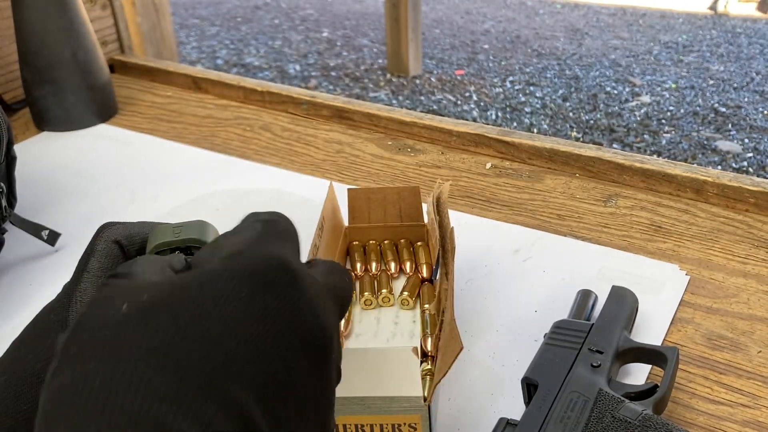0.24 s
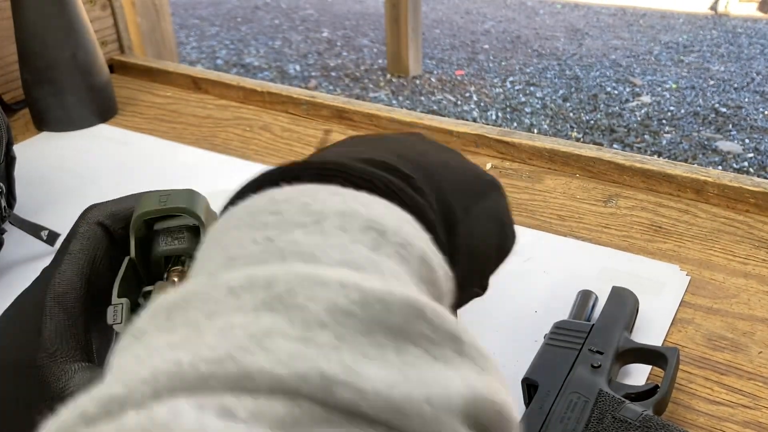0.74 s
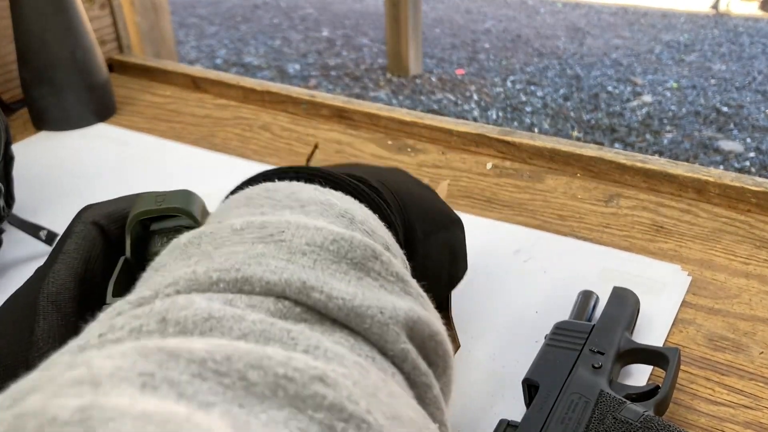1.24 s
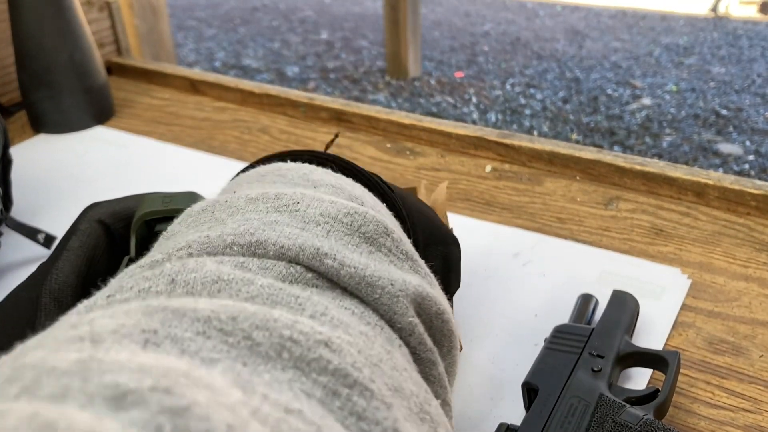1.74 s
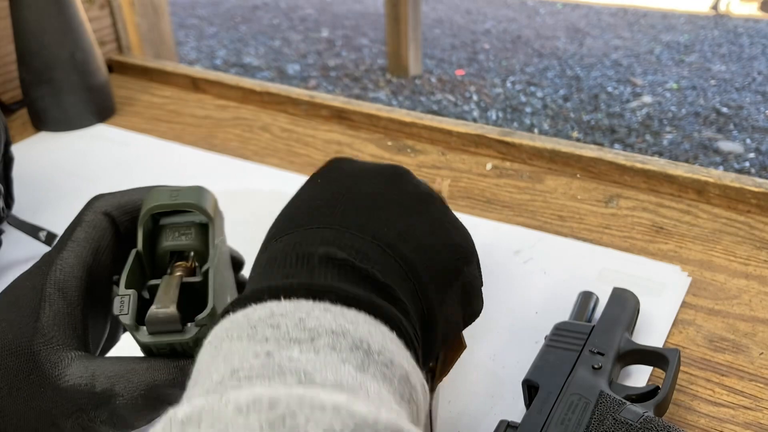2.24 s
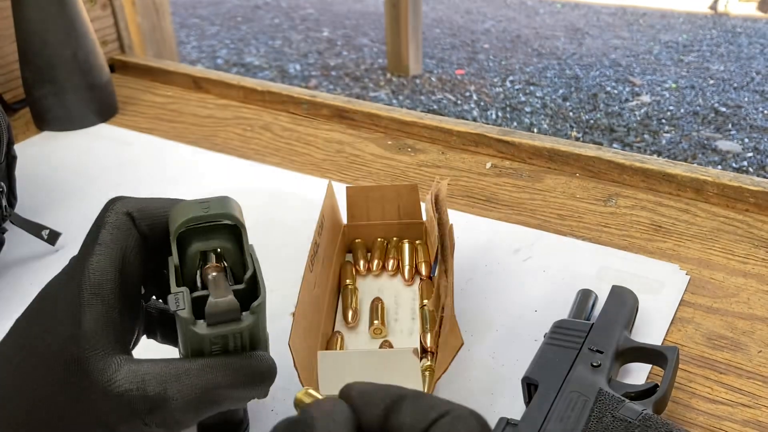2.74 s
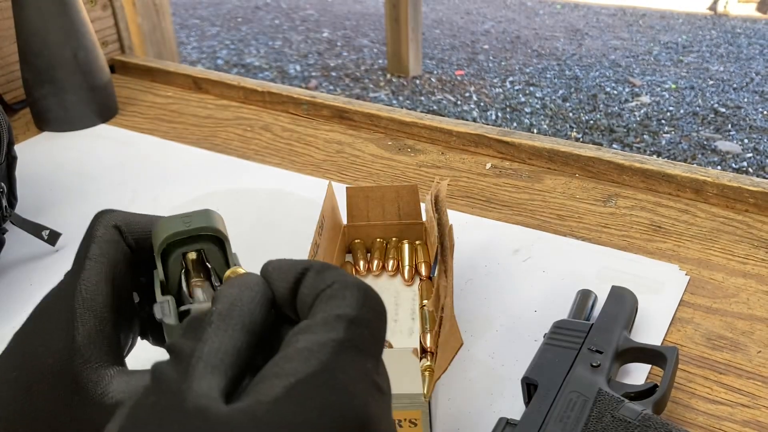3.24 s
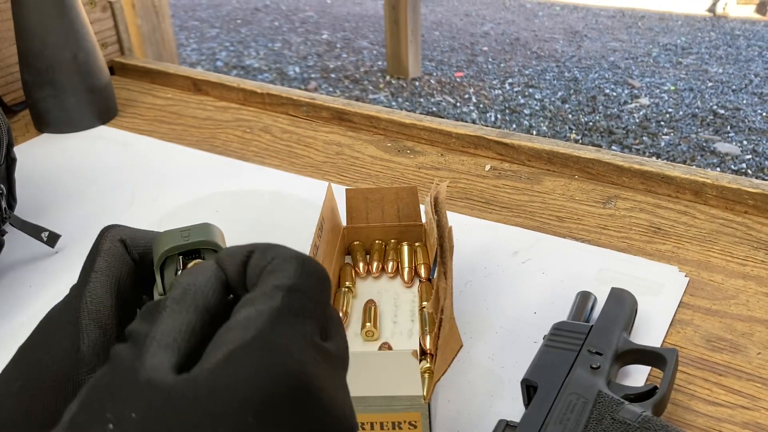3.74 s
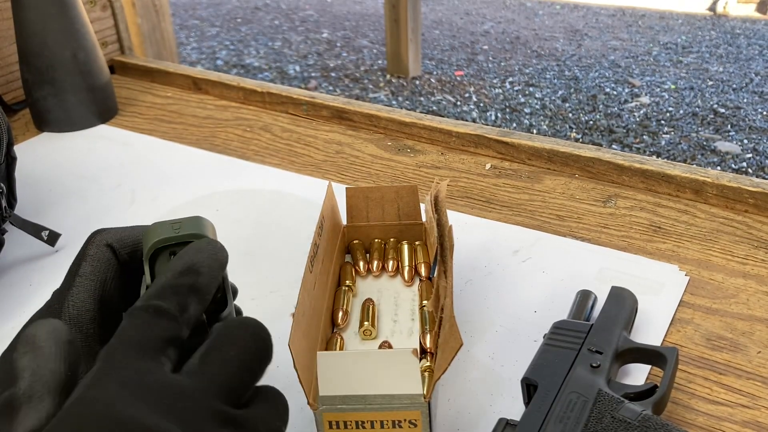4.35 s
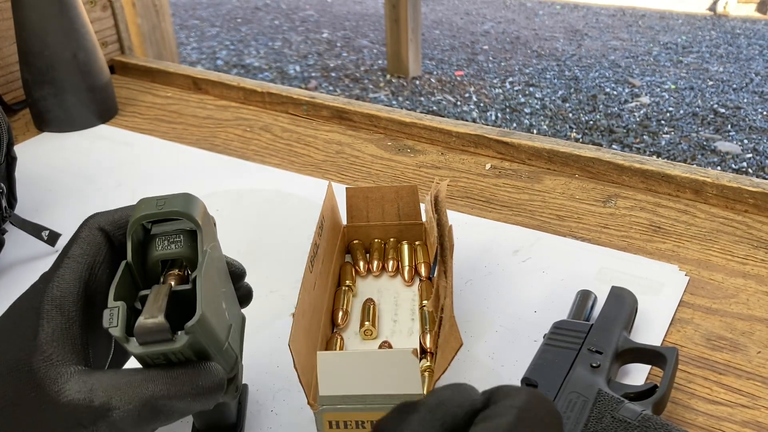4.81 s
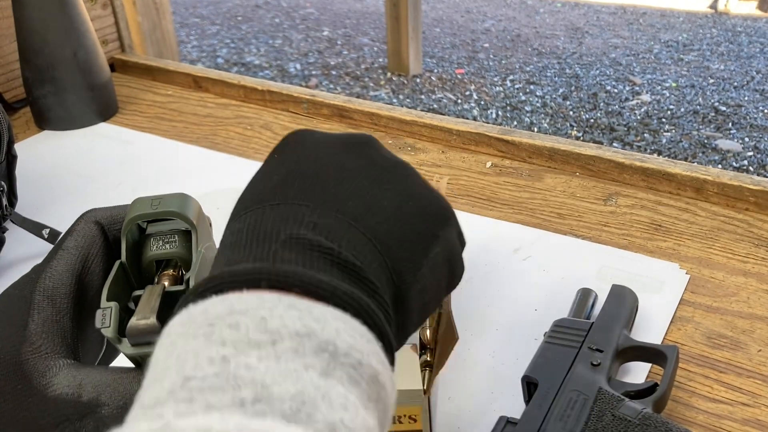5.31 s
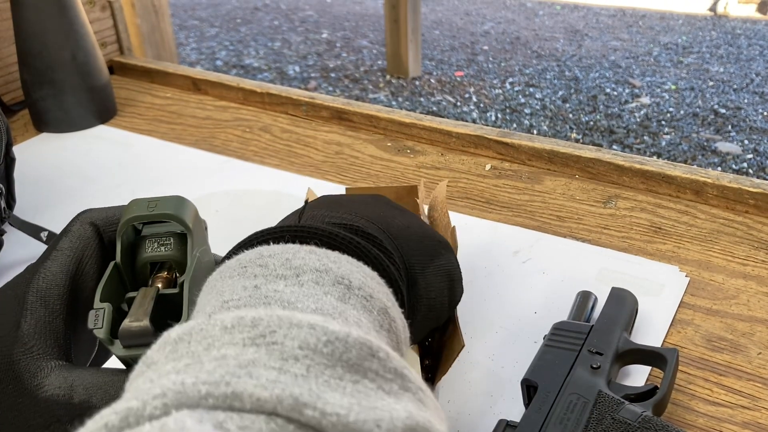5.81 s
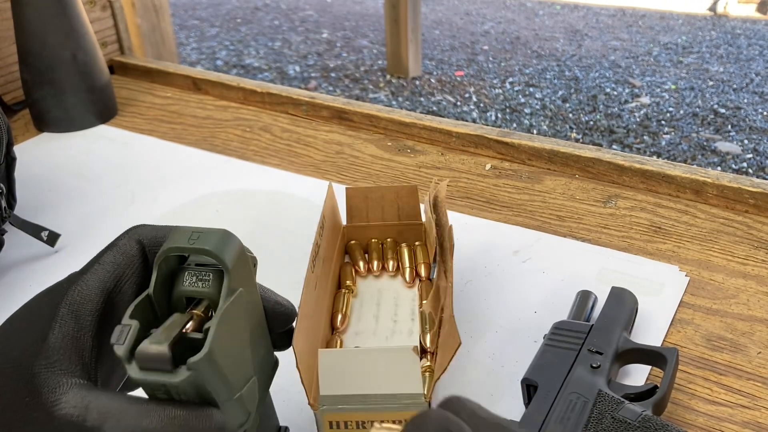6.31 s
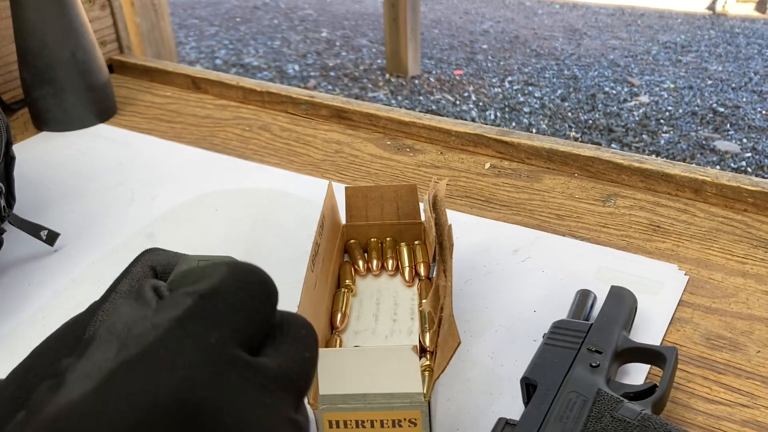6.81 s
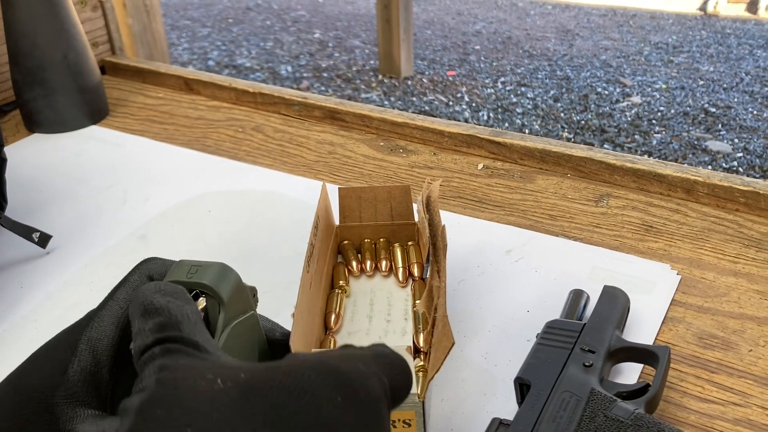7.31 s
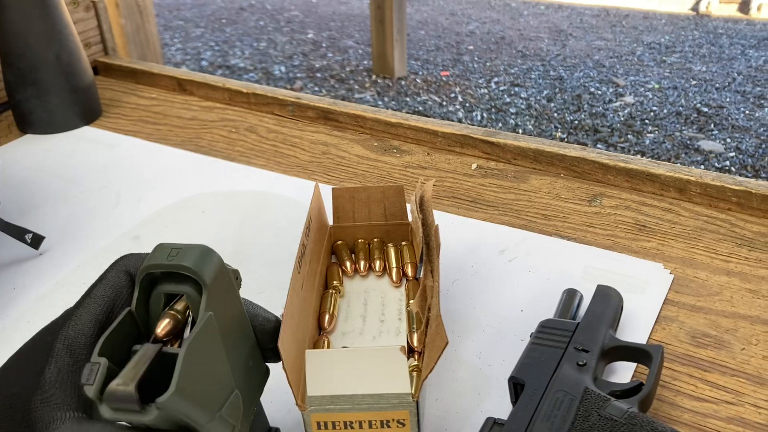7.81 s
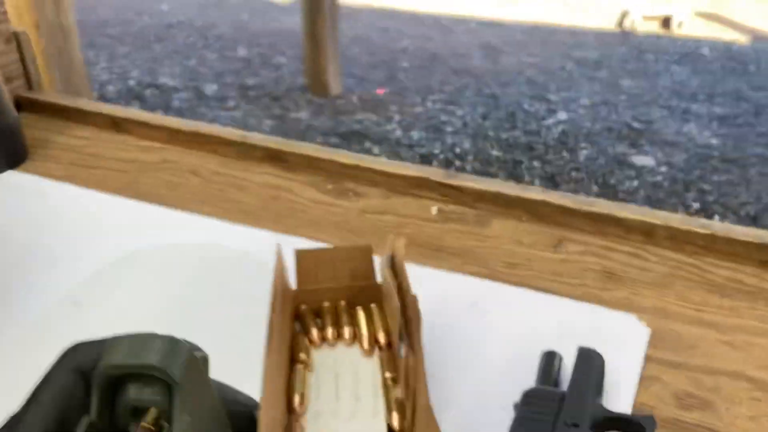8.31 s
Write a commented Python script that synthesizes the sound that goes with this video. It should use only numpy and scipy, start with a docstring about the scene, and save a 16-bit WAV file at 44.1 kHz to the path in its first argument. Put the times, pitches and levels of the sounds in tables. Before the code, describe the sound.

Sharp plastic clicks and small metallic pings as cartridges are pressed into a magazine, with bench thumps, cardboard rustling and glove rubbing.

```python
"""Clicks of a plastic thumb loader lead as gloved hands fill a pistol magazine on a wooden outdoor bench.
Each click is a noisy snap that rings the loader; a sprung plunger and brass cartridges add short falling tones.
The magazine bumps and drags on the bench, and fingers knock and scrape a cardboard cartridge box.
Sleeve and gloves rustle as shaped noise over a low outdoor rumble. A roof adds short echoes to a wide stereo image."""
import sys
import numpy as np
from scipy import signal
from scipy.fft import rfft, irfft
from scipy.io import wavfile

SR = 44100
rng = np.random.default_rng(int(sys.argv[2]) if len(sys.argv) > 2 else 0)


def file_out(sig):
    """Save sig as 16-bit WAV at sys.argv[1]."""
    # one column per channel
    cols = np.atleast_2d(sig).T
    # limit, then scale
    lim = np.clip(cols, -1, 1)
    pcm = np.round(lim * 32767).astype(np.int16)
    wavfile.write(sys.argv[1], SR, pcm)


N = 377496
AGE = np.arange(SR // 4) / SR   # seconds since a contact began
APPROACH_S = .008   # parts scrape for this long before they snap home

# Modes of the loader with its cartridge, before shifts at each contact: pitch_hz, width_hz, level_db
LOADER_MODES = [(1013, 81, 14.5), (1550, 96, 4), (2100, 360, 11.5), (2486, 320, 17), (3490, 200, 18.5),
                (4320, 320, 7.5), (4790, 630, 17.5), (5730, 490, 15.5), (6830, 380, 16), (8500, 1700, 16.5),
                (11550, 1300, -45)]
# Modes of the bench top, before chance level changes: pitch_hz, width_hz, level_db
BENCH_MODES = [(67, 34, 11), (132, 21, 10), (175.4, 5.8, 17.5), (223, 48, 14), (308, 36, 4), (373, 32, 5),
               (424.5, 10, 8.5), (485, 8.8, -19), (627, 19, -5.5), (773, 58, -1.5), (1003, 33, 4)]


def amp(db):
    """Turn decibels into gain."""
    return 10 ** (np.asarray(db) / 20)


def rms_one(x):
    """Scale a sound to an rms of 1."""
    return x / np.sqrt(np.mean(x ** 2) + 1e-20)


def at_hz(points, hz):
    """Read a spectrum between its points on a log-frequency axis."""
    f, value = np.transpose(points)
    return np.interp(np.log(hz + 1), np.log(f), value)


def colour(x, spectrum):
    """Filter a sound with a smooth spectrum."""
    size = x.shape[-1]
    gain = amp(at_hz(spectrum, np.fft.rfftfreq(size, 1 / SR)))
    return irfft(rfft(x) * gain, size)


def drift(rate_hz):
    """Smooth random wandering with a spread of 1: low-passed noise, made at every 40th sample."""
    step = 40
    r = np.exp(-2 * np.pi * rate_hz * step / SR)
    noise = rng.standard_normal(N // step + 2002)
    slow = signal.lfilter([1], [1, -2 * r, r * r], noise)[2000:]   # skip the filter's start
    return np.interp(np.arange(N) / step, np.arange(len(slow)), rms_one(slow))


def fade(t60):
    """Exponential decay that falls 60 dB in t60 seconds."""
    return np.exp(-np.log(1000) * AGE / t60)


def add(track, start_s, sound):
    """Mix a sound into a track from its start time."""
    at = max(round(start_s * SR), 0)
    track[at:at + len(sound)] += sound[:N - at]


def tone(hz, t60, sharp_hz, settle_s):
    """A struck mode starts sharp and sinks to its final pitch as the load settles."""
    pitch = hz + sharp_hz * np.exp(-AGE / settle_s)
    return np.sin(2 * np.pi * np.cumsum(pitch) / SR) * fade(t60)


def detuned(modes, share):
    """Shift each mode by a random share of its pitch for one contact."""
    return [(hz * (1 + share * rng.standard_normal()), width, db) for hz, width, db in modes]


def resonate(force, modes):
    """A body passes the force and rings; each contact point favours other modes."""
    out = force.copy()
    for hz, width, db in modes:
        r = np.exp(-np.pi * width / SR)
        feed = [(1 - r * r) / 2, 0, (r * r - 1) / 2]
        feedback = [1, -2 * r * np.cos(2 * np.pi * hz / SR), r * r]
        out += amp(db + 2 * rng.standard_normal()) * signal.lfilter(feed, feedback, force)
    return out


def registers(edges):
    """Make a steep band-pass for each register from two filters, the second slightly wider."""
    bands = []
    for low, high in zip(edges, edges[1:]):
        limits = ([low, high], [low * .8, min(high * 1.25, .45 * SR)])
        bands.append(np.vstack([signal.butter(2, band, "band", fs=SR, output="sos") for band in limits]))
    return bands


def tilted(db, brightness_db, hump_db):
    """Levels of three registers: a crisper contact puts more sound in the top one."""
    return [db - brightness_db, db + hump_db, db + brightness_db]


def voice_contact(sound, bands, levels_db):
    """Hardness shapes a contact: each register gets the energy of 10 ms at its given rms level."""
    out = 0
    for band, db in zip(bands, levels_db):
        part = signal.sosfilt(band, sound)
        out = out + amp(db) * part / np.sqrt(np.sum(part ** 2) / (SR / 100) + 1e-20)
    return out


def grains(size, grit_db):
    """Friction is a dense train of tiny slips of uneven size."""
    unevenness = np.minimum(rng.exponential(1, size), 5)
    return rms_one(rng.standard_normal(size) * amp(grit_db * unevenness))


def impact(crack_t60, rattle_db, rattle_t60, grit_db, approach_db):
    """Parts scrape together, crack home and then chatter against each other."""
    crack = grains(len(AGE), 0) * fade(crack_t60)
    rattle = amp(rattle_db) * grains(len(AGE), grit_db) * fade(rattle_t60)
    size = round(APPROACH_S * SR)
    approach = amp(approach_db) * grains(size, grit_db) * np.linspace(0, 1, size) ** 2
    return np.concatenate([approach, crack + rattle])


def friction(spectrum, grit_db, catch_db, catch_hz):
    """Fibres slip in clumps as the cloth catches and lets go."""
    slips = grains(N, grit_db) * amp(catch_db * drift(catch_hz))
    return rms_one(colour(slips, spectrum))


def stroke(start_s, length_s, db, swell_db):
    """Gain of one stroke: it sets in, gains or loses pressure evenly, and lets go."""
    attack_s, release_s = 0.033, 0.019   # time constants of the rise and fall outside the stroke
    gain, lead = np.zeros(N), 10 * attack_s
    t = np.arange(-lead, length_s + 10 * release_s, 1 / SR)
    outside = np.maximum(-t, 0) / attack_s + np.maximum(t - length_s, 0) / release_s
    pressure_db = db + swell_db * (np.clip(t / length_s, 0, 1) - .5)
    shape = amp(pressure_db) * np.exp(-outside)
    add(gain, start_s - lead, shape[t >= -start_s])   # leave out what lies before time zero
    return gain


def outdoor_air():
    """Low outdoor rumble: coloured noise, partly shared by both channels."""
    # Spectrum before the overall level is set: pitch_hz, level_db per Hz
    air_spectrum = [(15, -46), (25, -4.5), (70, 3), (153, 6), (384, -12), (7510, -35), (8360, -55),
                    (9070, -56), (10400, -35), (12500, -64.5), (13600, -52), (16000, -49)]
    noise = rng.standard_normal(N) + 0.35 * rng.standard_normal((2, N))
    return amp(-52.0) * rms_one(colour(noise, air_spectrum))


def grip_rumble():
    """Hands shift their grip on the magazine and make a low handling rumble."""
    # Firmness of the grip, before the rumble's 2 dB gain: time_s, level_db
    grip_level = [(0.0, -49), (0.08, -51.5), (0.26, -44.5), (3.33, -44.5), (3.5, -40), (3.77, -46.5),
                  (4.17, -43.5), (4.93, -50.5), (5.34, -44.5), (6.2, -47), (6.98, -44), (7.33, -42),
                  (7.55, -45.5), (8.3, -45.5), (8.56, -55.5)]
    # Spectrum before the level is set: pitch_hz, level_db per Hz
    grip_spectrum = [(25, -20), (45, -11), (62, 6), (100, 1.5), (127, 4), (160, -0.5), (240, -6),
                     (320, -16), (480, -23), (900, -46.5)]
    grip_db = np.interp(np.arange(N) / SR, *np.transpose(grip_level))
    return amp(grip_db + 2) * friction(grip_spectrum, grit_db=1.5, catch_db=2.0, catch_hz=10.0)


def rub_gains():
    """Strokes of glove and sleeve give the gains of rubbing on plastic, on card and of fibre hiss."""
    # A glove brushes the loader; levels are mid-stroke, before each rubbing layer's own gain:
    # start_s, length_s, level_db, swell_db over the stroke, dull body_db relative to the hiss
    glove_strokes = [(0.192, 0.023, -54.5, -15, 1), (0.333, 0.049, -49.5, 8.5, 7.5),
                     (2.531, 0.21, -60.5, 11, -8), (3.292, 0.087, -54.5, -3, -1), (3.582, 0.032, -51, 6, 3),
                     (3.986, 0.071, -53, 13, 2.5), (4.184, 0.11, -54, -1, -45),
                     (4.284, 0.13, -58, 28.5, -29), (4.462, 0.44, -76.5, -32, -8),
                     (4.962, 0.3, -61, -6, 1.5), (5.379, 0.029, -53, 25.5, -6), (6.17, 0.15, -55.5, 4, -39),
                     (6.327, 0.079, -52.5, 6, -31), (6.49, 0.26, -63, 12, -4), (7.092, 0.17, -57, 18, -8),
                     (7.486, 0.37, -59, -16, -1), (7.852, 0.17, -62, 16, -14)]
    # The sleeve drags over the box; levels as above:
    # start_s, length_s, level_db, swell_db over the stroke, fibre hiss_db relative to the card
    sleeve_strokes = [(0.29, 0.25, -52, 1, 1), (0.591, 0.031, -38, -5, -12), (0.702, 0.2, -51.5, -14.5, -2),
                      (0.866, 0.27, -39, -4, -9.5), (1.216, 0.37, -44.5, 2, -8.5),
                      (1.438, 0.12, -42, -1, -4.5), (1.677, 0.099, -41.5, -0.5, -9),
                      (1.792, 0.19, -48.5, -1, -6), (2.044, 0.12, -54, 7, -13),
                      (2.173, 0.12, -44.5, 6, -6.5), (5.474, 0.13, -52, 2, -3.5),
                      (5.863, 0.17, -48, -8.5, -4), (7.765, 0.28, -57.5, -18, -23),
                      (7.986, 0.089, -39, 20.5, -22), (8.113, 0.11, -39.5, -1.5, -14),
                      (8.247, 0.41, -53.5, -23.5, -50)]
    on_plastic, on_card = np.zeros(N), np.zeros(N)
    hiss = np.full(N, amp(-69.5))   # faint glove hiss between strokes
    for *row, body_db in glove_strokes:
        brush = stroke(*row)
        on_plastic += brush
        on_card += amp(body_db) * brush
        hiss += brush
    for *row, hiss_db in sleeve_strokes:
        pull = stroke(*row)
        on_card = np.hypot(on_card, pull)
        hiss = np.hypot(hiss, amp(hiss_db) * pull)
    return on_plastic, on_card, hiss


def cloth_hiss(hiss):
    """Fine fibres slip unevenly and make a bright hiss."""
    # Spectrum before the level is set: pitch_hz, level_db per Hz
    cloth_spectrum = [(3500, 7.5), (6000, 9), (7500, 10.5), (10000, 14.5), (12000, 1.5), (14000, 0.5),
                      (16000, 5), (18000, -2)]
    return amp(2.0) * hiss * friction(cloth_spectrum, grit_db=4.5, catch_db=3.5, catch_hz=28)


def glove_rub(hiss):
    """Glove fibres catch and slip more slowly, with a duller spectrum."""
    # Spectrum before the level is set: pitch_hz, level_db per Hz
    glove_spectrum = [(1300, -8.5), (2300, 7.5), (3100, 1), (4000, -0.5), (5500, -4), (8000, -15)]
    return amp(1.0) * hiss * friction(glove_spectrum, grit_db=3.5, catch_db=3.0, catch_hz=3.5)


def fidgets():
    """Loose parts shift in the loader's shell and tick, about 12 times a second."""
    shifts = (rng.random(N) < 12 / SR) * amp(4 * rng.standard_normal(N))
    bursts = signal.fftconvolve(shifts, fade(0.0074))[:N] * rng.standard_normal(N)
    return rms_one(resonate(bursts, LOADER_MODES))


def shell_rub(on_plastic):
    """A rub wakes mostly the shell's middle modes, about 2 to 4 kHz, while loose parts tick."""
    # Spectrum of the rub before the level is set: pitch_hz, level_db
    shell_spectrum = [(700, -24), (1900, -4), (2900, -11), (3700, 1), (5000, -7.5), (9000, -6)]
    rub = rms_one(colour(resonate(grains(N, grit_db=6.0), LOADER_MODES), shell_spectrum))
    return on_plastic * (amp(-1.0) * rub + amp(-9) * fidgets())


def sleeve_rub(on_card):
    """The sleeve rubs smoothly over the card as its fibres catch and slip."""
    # Spectrum before the level is set: pitch_hz, level_db per Hz
    sleeve_spectrum = [(250, -50.5), (450, 0), (700, 10), (1020, 8.5), (1400, 7.5), (2000, 2.5),
                       (2800, -36), (5000, -69)]
    return amp(-3) * on_card * friction(sleeve_spectrum, grit_db=5.5, catch_db=3.5, catch_hz=44)


def card_ticks(on_card, hiss):
    """Seams and fingertips catch edges of the card; each edge ticks at its own pitch."""
    # Spectrum of the ticks before the level is set: pitch_hz, level_db per Hz
    tick_spectrum = [(300, -6), (950, 14), (1900, 5.5), (4000, 6), (7000, -28), (14000, -70)]
    edge_count, catches_per_s, burst_t60_s = 10, 260, 0.0078   # the rate is shared by all edges
    ticks = 0
    for hz in np.geomspace(650, 3800, edge_count):
        sizes = amp(3 * np.clip(rng.standard_normal(N), -2, 1))
        catches = (rng.random(N) < catches_per_s / edge_count / SR) * sizes
        decay = amp(-60 / (burst_t60_s * SR))
        bursts = signal.lfilter([1], [1, -decay], catches + 1e-18) * rng.standard_normal(N)
        ticks = ticks + resonate(bursts, [(hz, 130, 22.5)])
    return amp(-3.5) * np.sqrt(on_card * hiss) * rms_one(colour(ticks, tick_spectrum))


def loader():
    """Plunger, feed lips and cartridge snap against each other and ring the loader."""
    # Clicks: time_s, level_db, brightness_db per register, magazine thud_db
    clicks = [(0.086, -49.5, -14, -37), (0.1, -32, 0.5, -31), (0.104, -48, 11, -47),
              (0.203, -41, -6.5, -43.5), (0.231, -42.5, -6, -35), (0.404, -42, -3, -49),
              (0.42, -29.5, -2.5, -33), (0.429, -27.5, 3.5, -28.5), (0.5, -36, -8.5, -48),
              (0.501, -42.5, -14, -42), (2.7248, -40, 13.5, -53), (2.989, -44, 0, -60),
              (3.29, -31.5, -0.5, -50), (3.301, -26.5, 3.5, -37), (3.3087, -38, 10, -43),
              (3.378, -35, -8, -52), (3.399, -43.5, 7, -53), (3.551, -55.5, -6.5, -50),
              (3.6328, -35, -1, -25), (3.91, -37.5, 1, -41), (3.922, -35.5, -0.5, -49),
              (4.044, -46.5, -8, -43), (4.263, -32, 5, -40), (4.309, -43, 2, -40), (4.327, -40, 2, -53),
              (4.525, -48.5, -5.5, -49), (5.075, -43.5, -9, -36.5), (5.505, -51.5, -9, -40.5),
              (5.614, -51, -5, -54), (6.288, -50, 6.5, -65), (6.418, -36, 4.5, -50),
              (6.432, -42.5, 12.5, -68), (6.562, -54, 1, -56), (6.73, -47, -4, -66),
              (6.775, -44.5, -2, -56), (7.113, -60, -9, -45), (7.0204, -27, 2.5, -32.5),
              (7.03, -37, 6, -30.5), (7.043, -38, 1, -40), (7.164, -39, 6, -44), (7.192, -40, 1.5, -42),
              (7.217, -43, -10.5, -38), (7.364, -51, 0, -49), (7.405, -43, -1.5, -48.5),
              (7.476, -50, -5, -50), (7.489, -36, 0.5, -53), (7.546, -43.5, 2, -64),
              (7.712, -26.5, -0.5, -60), (7.716, -36.5, -8.5, -62), (7.747, -45, -4, -57)]
    # Limits of the thud register and the three above it: edge_hz
    click_edges = [400, 1500, 3500, 8500, 16500]
    out, bands = np.zeros(N), registers(click_edges)
    for s, db, brightness_db, thud_db in clicks:
        force = impact(crack_t60=0.0066, rattle_db=-17.0, rattle_t60=0.062, grit_db=4.0, approach_db=-17.5)
        levels_db = [thud_db, *tilted(db, brightness_db, hump_db=5.0)]
        modes = detuned(LOADER_MODES, 0.039)   # the hand and spring load shift the pitches
        add(out, s - APPROACH_S, voice_contact(resonate(force, modes), bands, levels_db))
    return out


def plunger():
    """The steel plunger snaps back and rings; the brass cartridge pings against the feed lips."""
    # Plunger snaps: time_s, level_db, tuning as a share of pitch,
    # brightness_db per octave, ring length as a share
    snaps = [(0.1, -20, 1.0, 0, .6), (3.2902, -15, 1.05, -2, .7), (3.3782, -19.5, 1.0, -2, 1.2),
             (6.4208, -11.5, 1.0, -1.5, .62), (7.1635, -25, 1.03, -3, .4)]
    # Plunger modes before each snap's level, tuning and length: pitch_hz, level_db, t60_s
    plunger_modes = [(1965, -13, .11), (2110, -4, .034), (2440, -1, .026), (4080, -8, .028),
                     (4520, -4, .022), (5150, -6, .018), (7200, -3, .012)]
    # Cartridge pings: time_s, level_db, final pitch_hz, t60_s
    pings = [(0.429, -16, 7700, 0.051), (2.7248, -35, 1740, 0.034), (2.724, -17, 15000, 0.02),
             (3.3015, -18, 3200, 0.027), (3.303, -23, 5150, .025), (3.303, -22, 2400, 0.038),
             (3.91, -12, 6800, 0.013), (7.022, -16, 4550, 0.024), (7.0197, -21, 3160, 0.082),
             (7.715, -15.5, 2440, 0.023)]
    sharp_hz, settle_s = 195, 0.011   # each tone starts this sharp and settles
    out = np.zeros(N)
    for s, db, tuning, brightness_db, length in snaps:
        for hz, mode_db, t60 in plunger_modes:
            octaves = np.log2(hz / plunger_modes[0][0])
            gain = amp(db + mode_db + brightness_db * octaves)
            start_s = s + rng.uniform(0, 0.00078)
            add(out, start_s, gain * tone(hz * tuning, t60 * length, sharp_hz, settle_s))
    for s, db, hz, t60 in pings:
        add(out, s, amp(db) * tone(hz, t60, sharp_hz, settle_s))
    return out


def bench():
    """The magazine's base pushes on the boards and settles."""
    # Bumps, from a booming padded hand to the knocking bare base plate:
    # time_s, level_db before the hardness loss, hardness from 0 to 1
    bumps = [(0.104, -21, 0.19), (0.343, -24.5, 0.027), (0.435, -22.5, 0.31), (0.514, -22, 0.045),
             (0.679, -31.5, 0.018), (1.28, -18.5, 0.2), (1.388, -19, 0.18), (1.937, -24.5, 0.11),
             (2.73, -22.5, 0.083), (3.001, -23, 0.34), (3.008, -11.5, 0.29), (3.296, -24, 0.51),
             (3.407, -29.5, 0.016), (3.597, -19.5, 0.31), (3.6364, -8, 0.74), (3.655, -24, 0.045),
             (3.912, -21.5, 0.74), (4.521, -22.5, 0.14), (5.079, -25, 0.75), (5.139, -26.5, 0.017),
             (5.239, -25.5, 0.031), (5.437, -21.5, 0.1), (5.7, -34, .05), (6.436, -20, 0.094),
             (6.719, -24.5, 0.042), (6.772, -18, 0.2), (6.794, -25.5, 0.092), (6.904, -25, 0.072),
             (7.024, -17, 0.37), (7.453, -23.5, .02), (7.49, -25, 0.57), (7.722, -22, 0.017),
             (8.126, -19.5, 0.11), (8.215, -22, 0.2)]
    # Limits of the three registers: edge_hz
    bump_edges = [50, 150, 400, 1400]
    out, bands = np.zeros(N), registers(bump_edges)
    for s, db, hardness in bumps:
        force = amp(-24.5) * grains(len(AGE), 0) * fade(0.092)
        force[0] += 1
        # registers lose level as their hardness differs from the bump's
        levels_db = db - 36.5 * np.abs(np.array([0, .5, 1]) - hardness)
        add(out, s - .003, voice_contact(resonate(force, BENCH_MODES), bands, levels_db))
    return out


def drags():
    """The base plate judders over the boards in tiny slips."""
    # Shoves over the bench: middle_s, level_db, brightness_db per register,
    # spread_s of the bell-shaped push (at least 5 ms is used)
    drag_events = [(0.196, -41, -1, 0.02), (0.368, -39.5, -9, 0.066), (2.986, -38, -7, 0.018),
                   (3.572, -36.5, -3.5, 0.014), (3.601, -32.5, 2, 0.0098), (3.62, -37, 4, 0.016),
                   (4.058, -42.5, -8, 0.043), (4.316, -38, -9, 0.025), (6.68, -40.5, -6.5, 0.14),
                   (6.726, -37.5, 0.5, 0.018), (6.78, -42.5, 13.5, 0.0043), (6.907, -39, -2, 0.019),
                   (7.503, -40, -4, 0.028), (7.552, -42, -7.5, 0.0074), (8.238, -45.5, 6, 0.059)]
    # Limits of the three registers: edge_hz
    drag_edges = [120, 280, 550, 1200]
    out, middle, bands = np.zeros(N), AGE[-1] / 2, registers(drag_edges)
    for s, db, brightness_db, spread in drag_events:
        push = np.exp(-((AGE - middle) / max(spread, .005)) ** 2 / 2)
        judder = resonate(push * grains(len(AGE), grit_db=6.5), BENCH_MODES)
        levels_db = tilted(db, brightness_db, hump_db=4.0)
        add(out, s - middle, voice_contact(judder, bands, levels_db))
    return out


def box():
    """Fingers and cartridges knock the card: the struck wall rings over the hollow of the box."""
    # Knocks: time_s, level_db, brightness_db per register, wall pitch_hz, contact t60_s
    knocks = [(0.279, -48.5, -6, 1420, 0.022), (0.888, -47.5, 14, 1020, 0.018),
              (0.932, -52.5, 15, 950, 0.0091), (0.948, -50, -17, 1160, 0.023),
              (1.077, -45, -1, 1130, 0.035), (1.103, -47, 5, 940, 0.028), (1.292, -38.5, -10, 1470, 0.04),
              (1.3718, -34, -13, 1160, 0.016), (1.382, -37.5, 4, 1390, 0.033),
              (1.397, -37.5, -1, 930, 0.036), (1.49, -45, -8.5, 2260, 0.026),
              (1.528, -45.5, -4, 1040, 0.017), (1.555, -47, 2, 2200, .025),
              (1.605, -41.5, -8.5, 1540, 0.057), (1.697, -43.5, -6, 1230, 0.044),
              (1.719, -49, -13, 1130, 0.013), (1.822, -40.5, -6, 1600, 0.034),
              (1.863, -37, -8, 1550, 0.013), (1.932, -31, -5, 1770, 0.032), (1.978, -39.5, -7, 1870, 0.023),
              (2.044, -51, -9, 1520, 0.037), (2.158, -47.5, -4.5, 1750, 0.049),
              (5.2107, -29, -7.5, 1760, 0.007), (5.2133, -34, -8.5, 1120, .014),
              (5.222, -43, 1, 1120, 0.015), (5.236, -42, -1, 1545, 0.025), (5.379, -47, -7, 1600, 0.069),
              (5.424, -45.5, -13.5, 1090, 0.04), (5.676, -53.5, -1, 2560, 0.032),
              (5.777, -47.5, -9, 1770, .035), (5.799, -50, -11.5, 1670, 0.018),
              (5.813, -53, 5, 1640, 0.025), (5.89, -47.5, -10, 1050, 0.033), (7.988, -62.5, 17, 990, 0.017),
              (8.13, -57, -13, 880, 0.018), (8.216, -59, 0, 1140, .015)]
    # Limits of the hollow's register and the three above it: edge_hz
    knock_edges = [150, 400, 1400, 3500, 16000]
    # Box modes before shifts at each knock: pitch_hz, width_hz, level_db
    box_modes = [(617, 17, 24), (1110, 280, 22), (1250, 40, -8), (1700, 54, 34), (1930, 210, 25),
                 (2170, 380, 32), (4440, 4700, 10)]
    out, bands = np.zeros(N), registers(knock_edges)
    for s, db, brightness_db, wall_hz, crack_t60 in knocks:
        force = impact(crack_t60, rattle_db=-19, rattle_t60=0.11, grit_db=-0.5, approach_db=-12)
        modes = [(wall_hz, 110, 32), *detuned(box_modes, 0.042)]
        levels_db = tilted(db, brightness_db, hump_db=4.5)
        hollow_db = levels_db[0] - 22
        add(out, s - APPROACH_S, voice_contact(resonate(force, modes), bands, [hollow_db, *levels_db]))
    return out


def seating():
    """The magazine bottoms out: the bench gives a dull, sinking thump and the magazine's body rings."""
    # Bench thumps: time_s, level_db, final pitch_hz, t60_s
    thumps = [(0.432, -12, 175, .035), (1.282, -18, 121, 0.039), (2.731, -15, 117, 0.044),
              (3.0063, -4.5, 189, 0.049), (3.635, -5, 223, 0.024), (5.436, -15.5, 115, 0.032),
              (7.023, -22, 178, .05)]
    # Body rings: time_s, level_db
    body_rings = [(3.003, -31), (3.6335, -11), (6.776, -30.5), (7.021, -29)]
    # Magazine modes before each ring's level: pitch_hz, level_db, t60_s
    magazine_modes = [(396, -3.5, 0.055), (653, -11, 0.051), (1015, -4.5, 0.032), (1320, -15.5, 0.029),
                      (1520, -5.5, 0.021), (2420, -9, 0.026)]
    sharp_share, settle_s, rise_s = 0.94, 0.0043, 0.0027   # extra starting pitch; time constants
    out = np.zeros(N)
    for s, db, hz, t60 in thumps:
        load = 1 - np.exp(-AGE / rise_s)
        add(out, s, amp(db) * load * tone(hz, t60, sharp_share * hz, settle_s))
    for s, db in body_rings:
        for k, (hz, mode_db, t60) in enumerate(magazine_modes):
            ring = np.sin(2 * np.pi * hz * AGE) * fade(t60)
            add(out, s, (-1) ** k * amp(db + mode_db) * ring)   # neighbouring modes start in opposite directions
    return out


def board():
    """A firm push near its middle leaves a board of the bench humming."""
    # Pushes: time_s, level_db
    board_pushes = [(0.433, -19), (3.009, -27), (7.025, -27), (7.721, -31)]
    out = np.zeros(N)
    for s, db in board_pushes:
        add(out, s, amp(db) * np.sin(2 * np.pi * 178.9 * AGE) * fade(0.26))
    return out


def slides():
    """A part of plastic, brass or card gathers speed, scraping, and stops."""
    # Short slides: peak_s, level_db, brightness_db per register, swell_s time constant (at least 2 ms is used)
    slide_events = [(0.497, -34.5, 3, 0.0085), (0.699, -48, 14, 0.011), (1.279, -32.5, -1, 0.012),
                    (3.312, -38.5, 7, 0.014), (4.252, -50.5, -11, 0.0028), (4.413, -41, 4.5, 0.016),
                    (5.407, -52.5, -14, 0.034), (5.431, -43.5, -8, 0.014), (5.702, -47, -9, 0.025),
                    (6.408, -52.5, 15, 0.07), (7.638, -40, -1, 0.016), (7.696, -43.5, -9, 0.017),
                    (7.713, -33, 6.5, 0.0077), (7.724, -49, -8, 0.007)]
    # Limits of the three registers: edge_hz
    slide_edges = [600, 2000, 7000, 16000]
    out, lead, bands = np.zeros(N), AGE[-1] / 2, registers(slide_edges)
    for s, db, brightness_db, swell in slide_events:
        speed = np.exp(np.minimum((AGE - lead) / max(swell, .002), (lead - AGE) / 0.0087))
        scraping = speed * grains(len(AGE), grit_db=5.5)
        levels_db = tilted(db, brightness_db, hump_db=1.3)
        add(out, s - lead, voice_contact(scraping, bands, levels_db))
    return out


def scrapes():
    """A cartridge or knuckle scrapes the card: uneven slips ring one wall of the box."""
    # Scrapes: middle_s, level_db, spread_s of the bell-shaped swell (at least 3 ms is used), wall pitch_hz
    scrape_events = [(0.901, -36, 0.012, 1070), (0.975, -46, .03, 1060), (1.049, -37.5, .022, 940),
                     (1.08, -38, 0.0053, 3500), (1.106, -35.5, .011, 910), (1.205, -43, 0.039, 970),
                     (1.616, -42.5, 0.0094, 710), (1.712, -43.5, 0.015, 3350), (1.827, -32.5, .008, 1940),
                     (1.944, -38, 0.0069, 1340), (5.226, -36, 0.017, 960), (5.394, -40.5, .012, 1390),
                     (5.509, -34, 0.0036, 1010), (5.549, -44, .014, 1010), (5.761, -53, 0.031, 1100),
                     (5.803, -40, 0.011, 1650), (5.875, -46.5, 0.022, 1030)]
    slips_per_s, sharpness, ring_db = 700, 4.8, 40.5   # sharpness is wall pitch over width
    out, middle = np.zeros(N), AGE[-1] / 2
    for s, db, spread, wall_hz in scrape_events:
        slips = (rng.random(len(AGE)) < slips_per_s / SR) * rng.standard_normal(len(AGE))
        wall_modes = [(wall_hz, wall_hz / sharpness, ring_db), (2 * wall_hz, wall_hz, 6)]
        wall = rms_one(resonate(slips, wall_modes))
        swell = np.exp(-((AGE - middle) / max(spread, .003)) ** 2 / 2)
        add(out, s - middle, amp(db) * wall * swell)
    return out


def squeak():
    """Stick and slip drives a thin, broken tone that sinks as the brass slides on."""
    # Squeaks, before pitch waver and level flutter: start_s, length_s, start_hz, end_hz, level_db
    squeak_events = [(3.799, 0.11, 8650, 6900, -56), (6.1, 0.093, 7800, 7300, -63)]
    out = np.zeros(N)
    waver = 1 + .011 * drift(400)
    flutter = amp(4.3 * np.minimum(drift(106), 1))
    for s, length, start_hz, end_hz, db in squeak_events:
        span = slice(round(s * SR), round((s + length) * SR))
        pitch = np.linspace(start_hz, end_hz, span.stop - span.start) * waver[span]
        thin_tone = np.sin(2 * np.pi * np.cumsum(pitch) / SR)
        add(out, s, amp(db) * flutter[span] * signal.windows.tukey(len(pitch)) * thin_tone)
    return out


def edge_rubs():
    """Glove fibres slip over one edge of the loader and keep a narrow band ringing."""
    # Rubs: start_s, length_s, mid-stroke level_db, swell_db over the stroke, pitch_hz, width_hz
    edge_events = [(4.622, 0.39, -66, 18, 3900, 260), (4.9, 0.17, -55, 12, 3070, 300),
                   (6.29, 0.137, -51, 19, 1960, 140), (6.36, 0.044, -51, 7, 3700, 202),
                   (6.697, 0.099, -46.5, 2, 797, 99)]
    out = np.zeros(N)
    for s, length, db, swell_db, hz, width_hz in edge_events:
        ring = signal.lfilter(*signal.iirpeak(hz, hz / width_hz, fs=SR), rng.standard_normal(N))
        out += stroke(s, length, db, swell_db) * rms_one(ring)
    return out


def shelter(x, t60, wet_db=0):
    """Bench, posts and roof scatter a short tail, different in each channel."""
    # Echo spectrum relative to the direct sound, before wet_db: pitch_hz, level_db
    echo_spectrum = [(60, -19.5), (150, -6.5), (400, 2.5), (1200, 0), (3500, -4), (7000, -9), (15000, -61)]
    tails = rng.standard_normal((2, len(AGE))) * fade(t60) * (AGE > .0015)
    tails = tails / np.sqrt(np.sum(tails ** 2, axis=1, keepdims=True))
    tails = amp(wet_db) * colour(tails, echo_spectrum)
    kept = len(AGE) * 3 // 4
    return x + signal.fftconvolve(x[None], tails[:, :kept], axes=1)[:, :N]


def place_right(x, lag_s):
    """A source to the right reaches the left channel later."""
    n = np.arange(N)
    return np.array([np.interp(n - lag_s * SR, n, x[0]), x[1]])


def scene():
    """Each source group has its own reflections under the roof; the outdoors rumbles behind."""
    on_plastic, on_card, hiss = rub_gains()
    in_hand = [
        grip_rumble() + cloth_hiss(hiss),
        glove_rub(hiss) + shell_rub(on_plastic) + edge_rubs(),
        loader() + squeak(),
        bench() + board(),
        drags(),
        slides(),
    ]
    hands_and_bench = sum(shelter(source, t60=0.092) for source in in_hand)
    # these sound close, so drier than the rest
    close = shelter(plunger(), t60=0.069, wet_db=-5) + shelter(seating(), t60=0.056, wet_db=-6.5)
    box_sources = [box(), sleeve_rub(on_card), card_ticks(on_card, hiss) + scrapes()]
    at_box = sum(shelter(source, t60=0.15) for source in box_sources)
    return outdoor_air() + close + hands_and_bench + place_right(at_box, lag_s=.00008)


def record(dry):
    """The left and right channels differ in phase and level, giving a wide stereo image; the top is cut."""
    # Phase by which the left leads, before it is reduced below 400 Hz: pitch_hz, lead_radians
    stereo_phase = [(0, 0), (130, 0.3), (430, 1.3), (860, 0.4), (1900, 1.7), (2840, 2.0), (4100, 1.4),
                    (5510, 2.2), (7100, 0.5), (8400, -2.6), (9150, -3.14), (10000, -3.9), (11400, -6.1),
                    (12900, -8.3), (13750, -9.42), (14500, -10.1), (15400, -12.2), (16700, -13)]
    # Left level minus right level: pitch_hz, difference_db
    stereo_balance = [(30, -4), (60, -6.5), (110, -1), (180, -6), (380, 1), (700, 2), (1290, 1.5),
                      (2380, 2.5), (4400, 1), (8120, -0.5), (15000, 1)]
    # Frequency response before the steep cut: pitch_hz, level_db
    top_response = [(20, -1), (8000, -5), (12500, 1), (15500, -4), (17000, -39)]
    hz = np.fft.rfftfreq(N, 1 / SR)
    resolved = np.minimum(hz / 400, 1)   # the lowest pitches stay nearly in step
    lead = resolved * np.interp(hz, *np.transpose(stereo_phase))
    tilt = amp(at_hz(stereo_balance, hz) / 2)
    channel_filters = np.array([tilt, np.exp(-1j * lead) / tilt])
    stereo = colour(irfft(rfft(dry) * channel_filters, N), top_response)
    top_cut = signal.ellip(10, .2, 80, 16800, fs=SR, output="sos")   # low-pass at 16800 Hz
    return signal.sosfilt(top_cut, stereo)


dry = scene()
out = record(dry)
file_out(out)
```